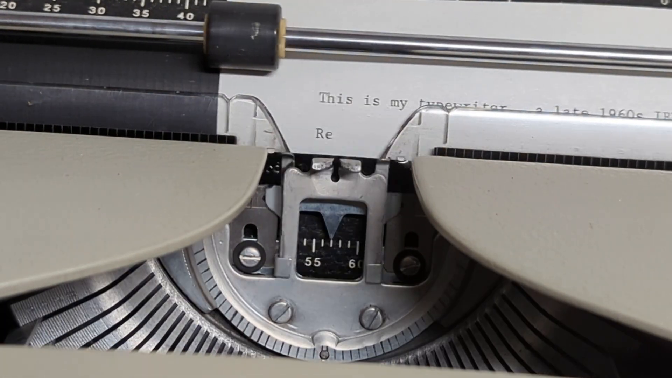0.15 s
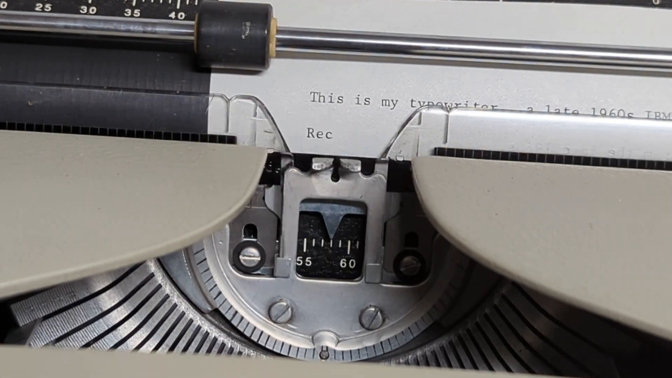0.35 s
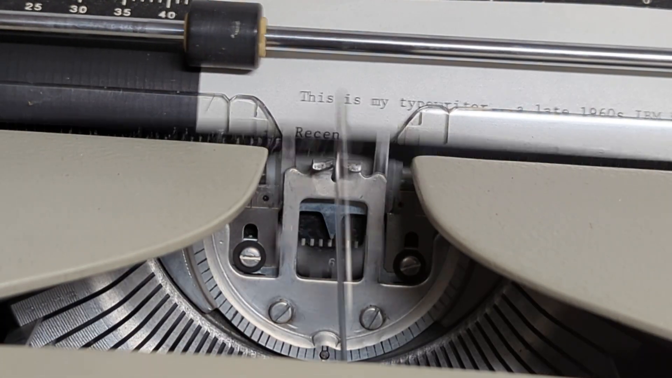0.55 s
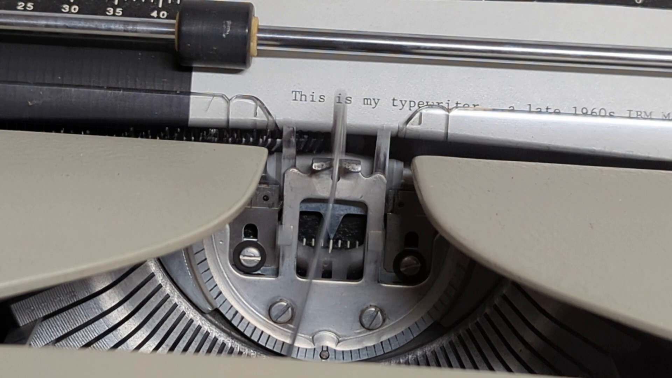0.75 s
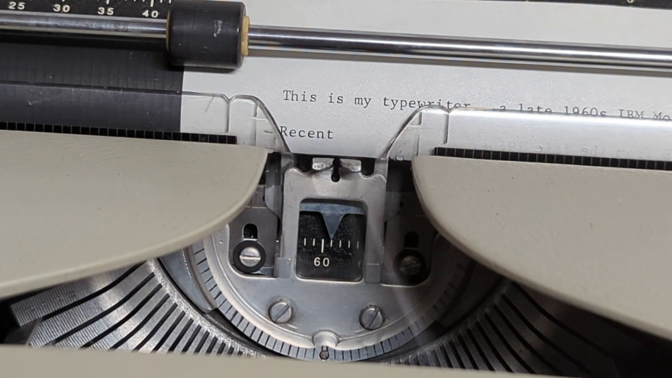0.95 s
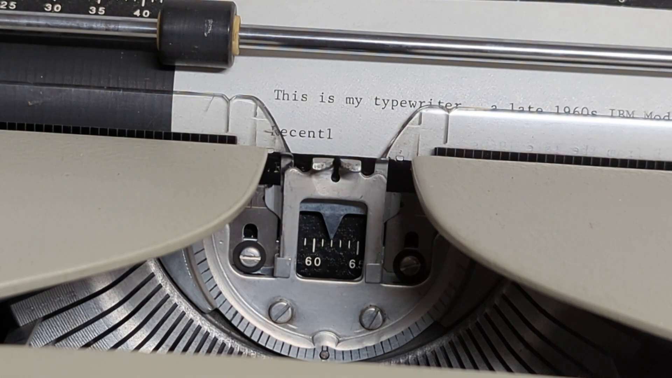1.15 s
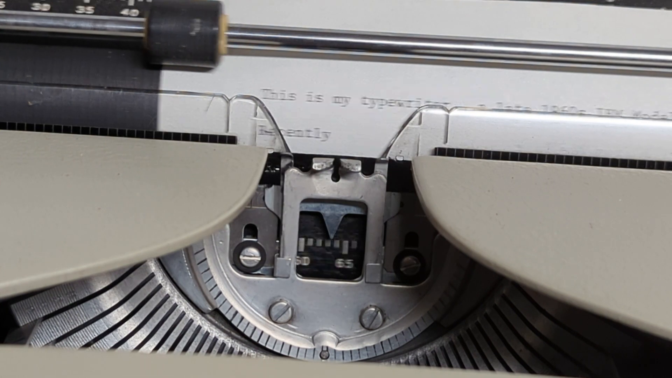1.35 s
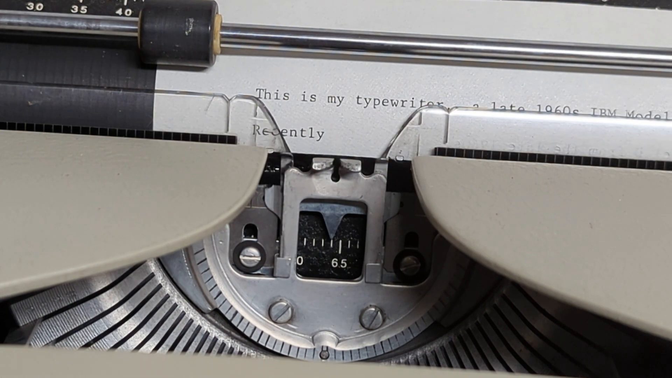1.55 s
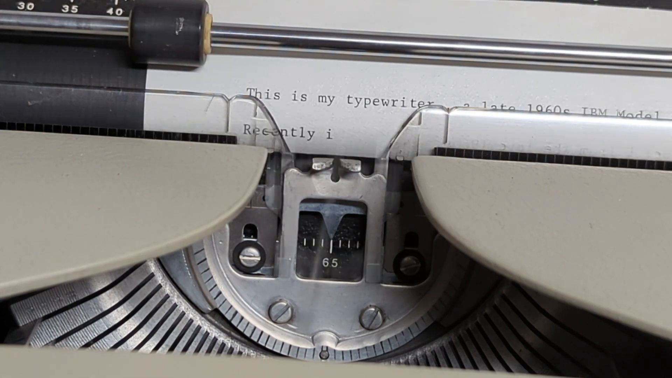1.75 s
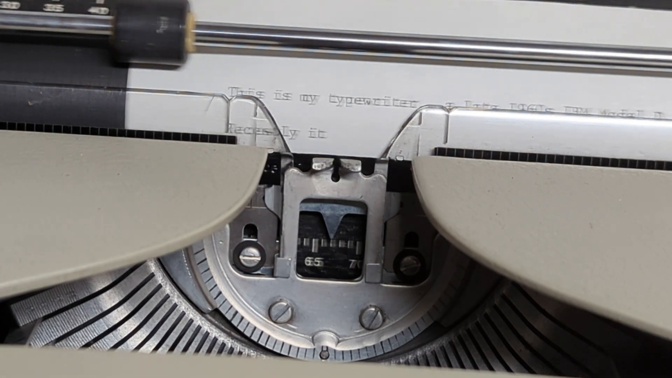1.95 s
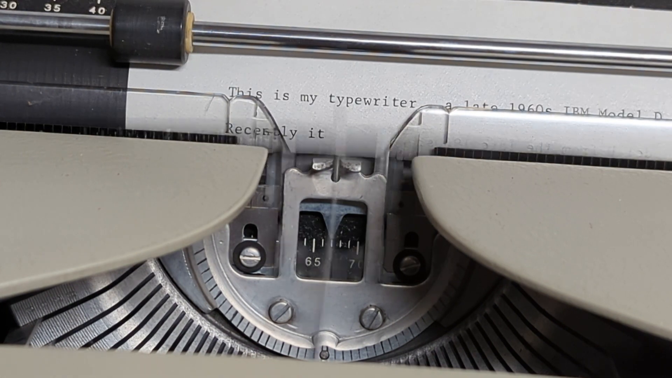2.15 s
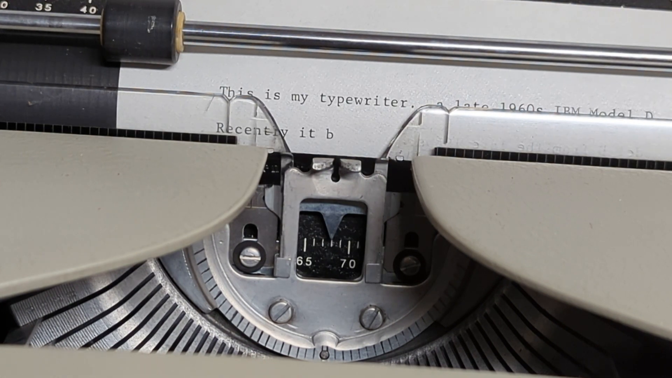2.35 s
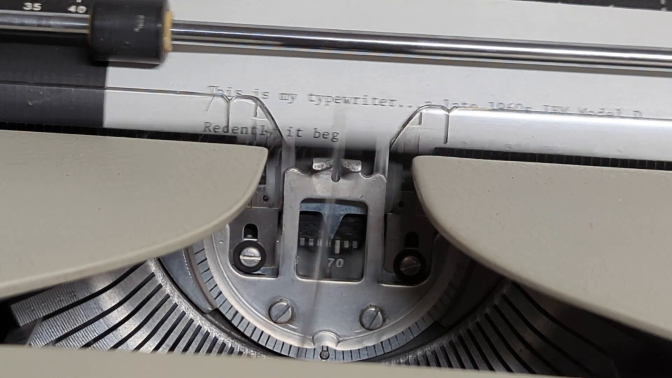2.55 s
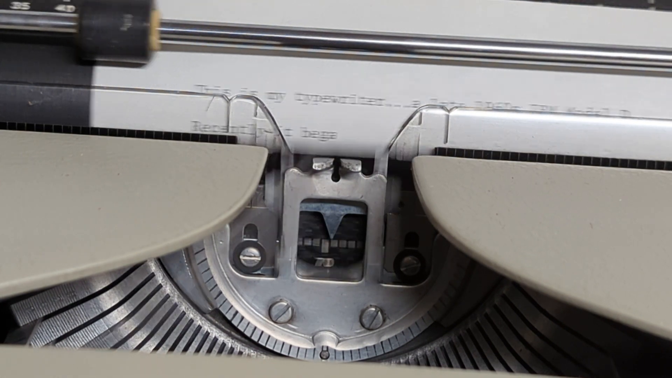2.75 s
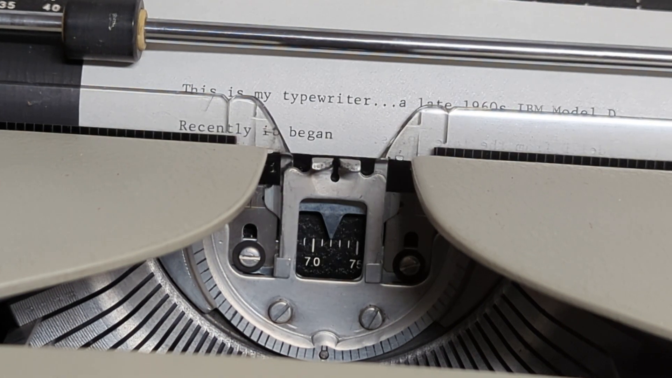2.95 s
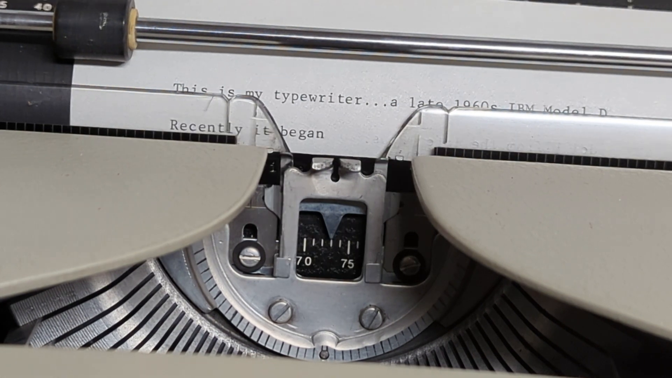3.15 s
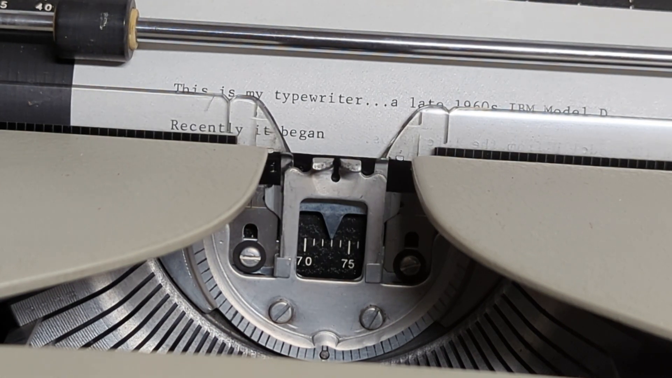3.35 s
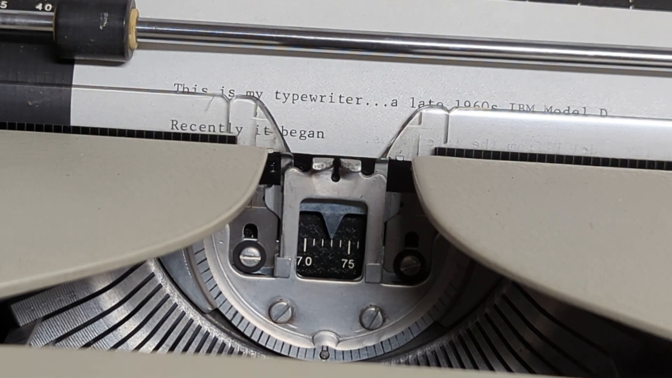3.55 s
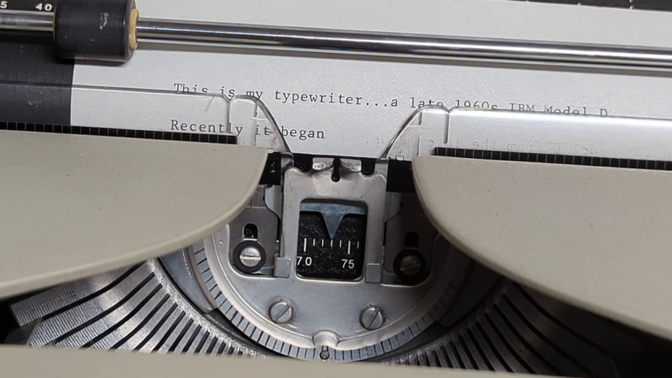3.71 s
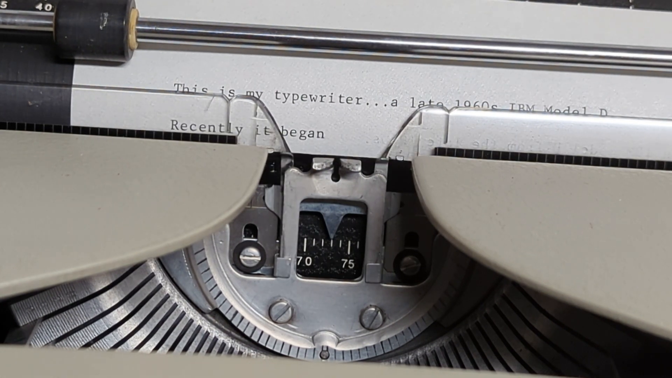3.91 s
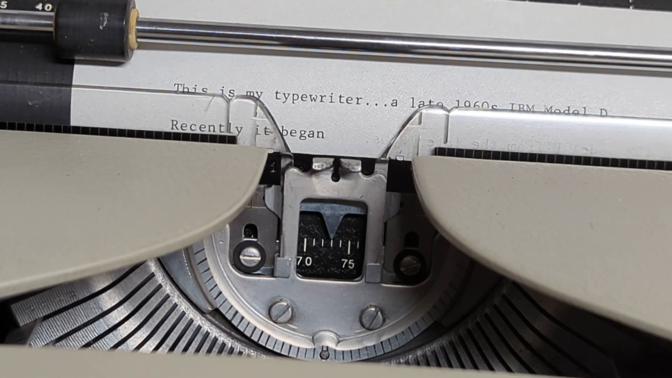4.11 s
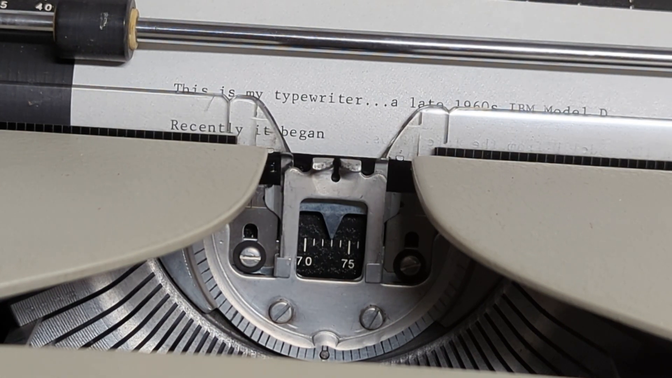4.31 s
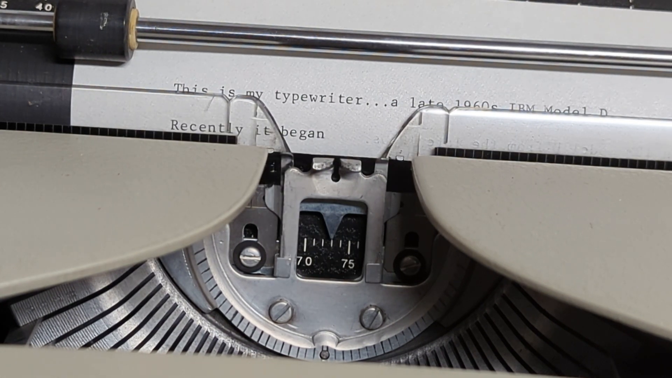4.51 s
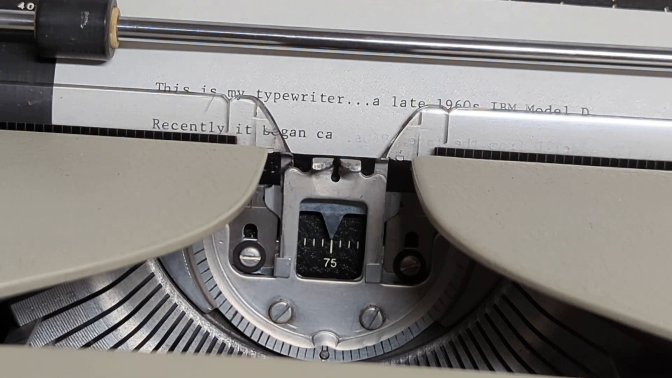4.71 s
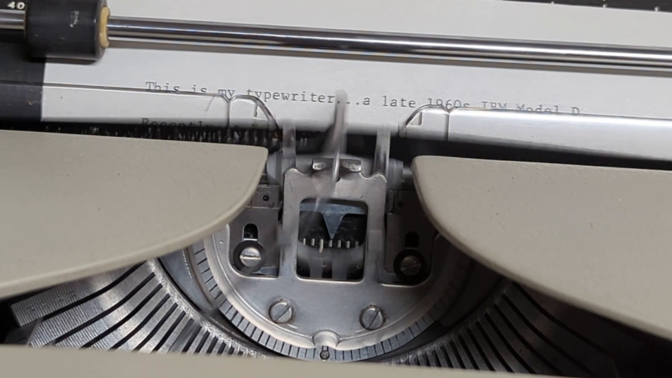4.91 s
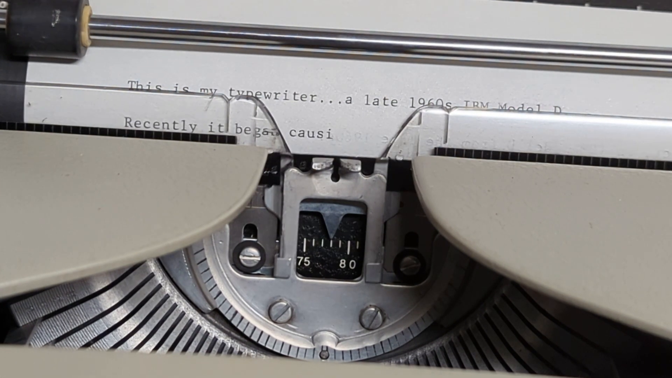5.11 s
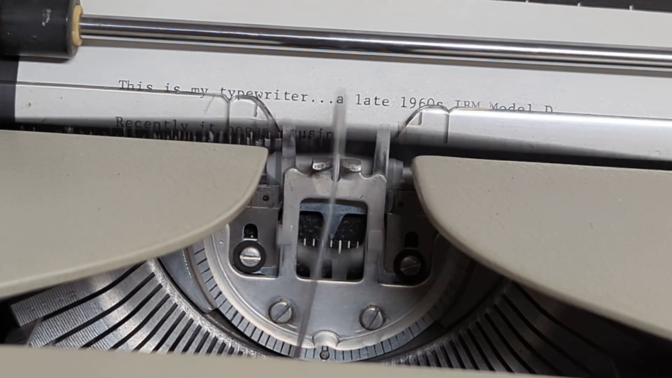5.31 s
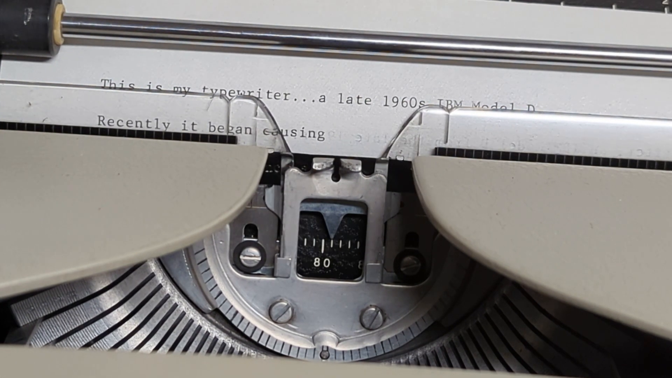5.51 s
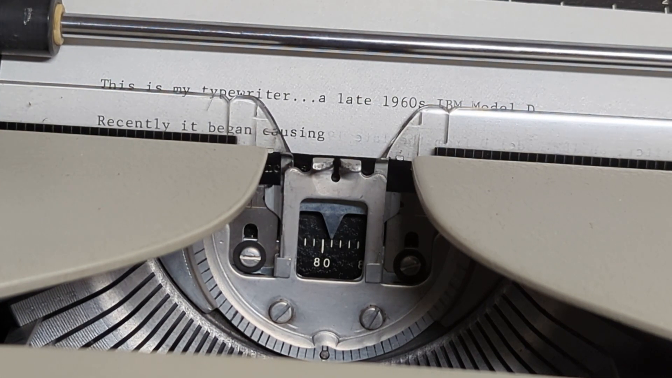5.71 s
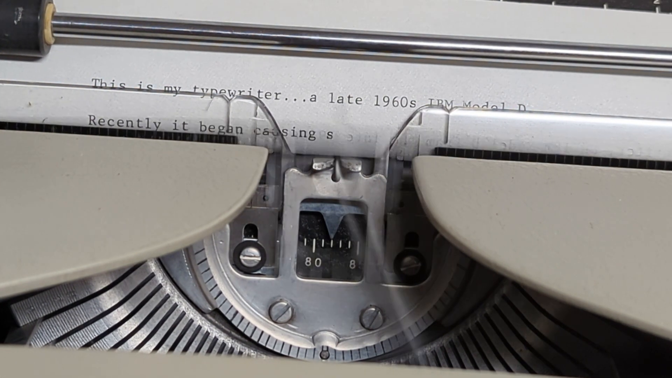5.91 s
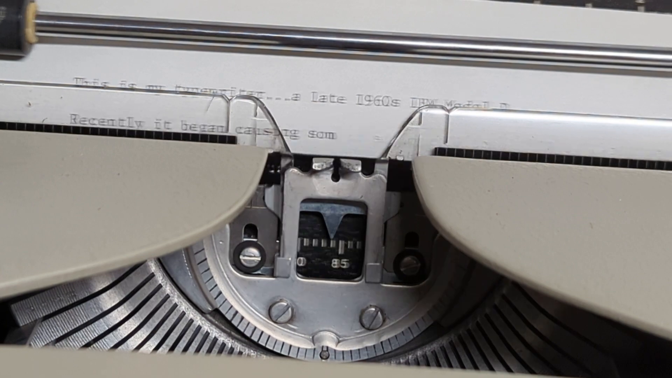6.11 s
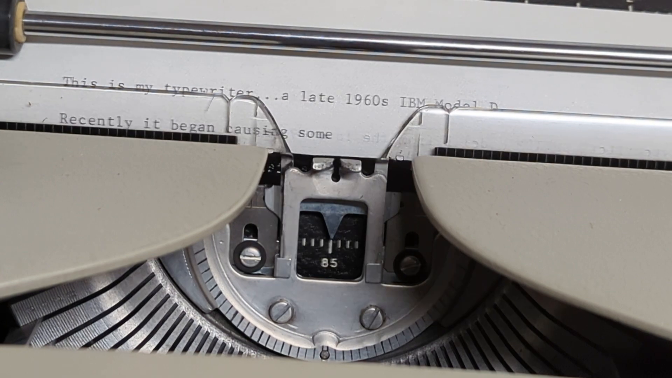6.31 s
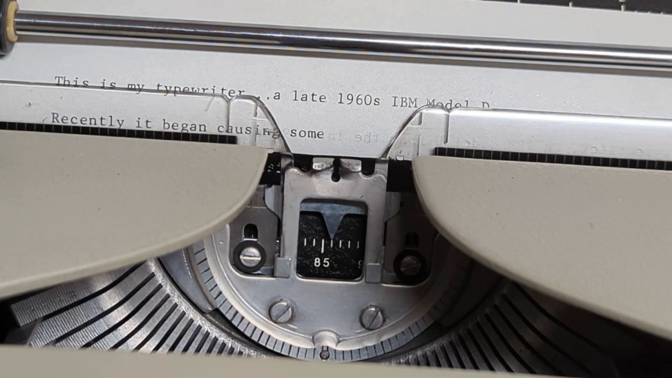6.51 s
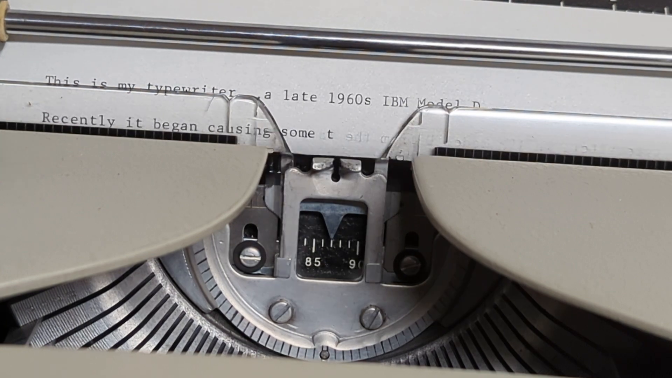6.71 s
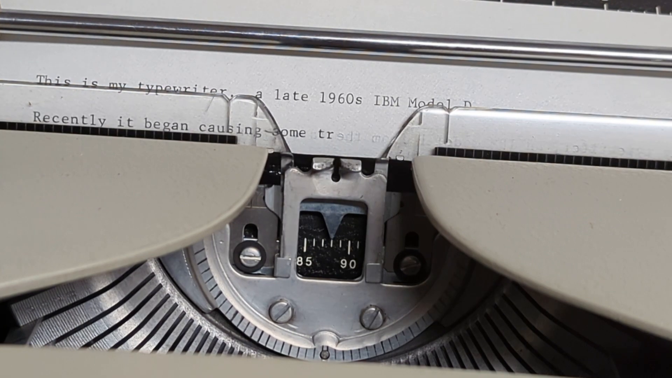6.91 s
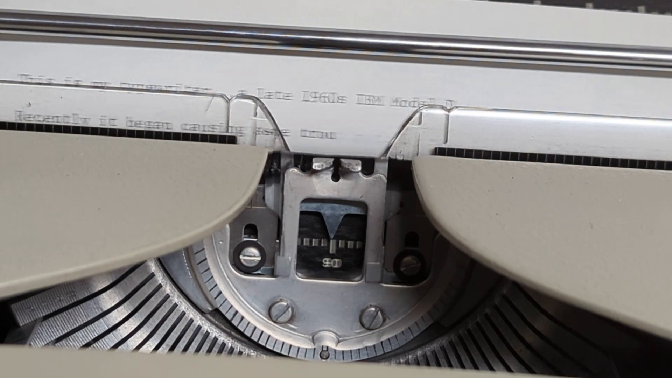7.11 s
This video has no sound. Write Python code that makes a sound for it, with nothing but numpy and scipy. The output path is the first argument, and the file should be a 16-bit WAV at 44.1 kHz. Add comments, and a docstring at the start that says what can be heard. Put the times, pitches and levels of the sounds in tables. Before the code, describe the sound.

An electric typewriter is heard up close in a small room, its motor humming low and its belt whirring steadily throughout. At the very start the basket of type bars drops with a thud and a brief metal clank. From about 0.2 to 3 seconds, type bars strike the paper in an uneven run of roughly five sharp clacks a second. Each has a short steel rattle and a low thump as the carriage jolts the desk, with light ticks and tiny pings in between. The space bar knocks more softly near 1.4, 2 and 3.2 seconds. Then the typing pauses, leaving little but the motor. At 4.6 seconds a faster run begins, broken by spaces near 5.5 and 6.4 seconds, with the last strike at about 7.2 seconds.

```python
"""First comes a thud and a clank as an electric typewriter's basket of type bars drops, over a humming
motor and a whirring belt. Then typing clacks along, with one pause. Each key trips a cam (a small rocking
lever) that swings a steel type bar up its guide. The bar slaps the paper on the roller, rings and falls
back, and the carriage steps on and jolts the desk. The case and a small room answer each clack."""
import sys
import numpy as np
from scipy import signal
from scipy.fft import rfft, irfft, next_fast_len
from scipy.io import wavfile
from scipy.ndimage import uniform_filter1d, map_coordinates

SR = 44100
rng = np.random.default_rng(int(sys.argv[2]) if len(sys.argv) > 2 else 0)


def bounce(signal):
    """Save signal as a 16-bit WAV file at the path given by the first command-line argument."""
    frames = np.transpose(np.atleast_2d(signal))
    limited = np.clip(frames, -1, 1)
    pcm = np.round(limited * 32767).astype(np.int16)
    wavfile.write(sys.argv[1], SR, pcm)


N = 320166

# The room's echo: (frequency [Hz], fade time [s]). A fade time is how long a sound takes to drop 60 dB.
ROOM_FADE = [(200, 0.57), (2000, 0.2), (12000, 0.11)]
# How alike the two ears' sounds are: (frequency [Hz], likeness [0 to 1])
EAR_LIKENESS = [(130, 1), (290, 0.98), (640, 0.8), (1400, 0.65), (3100, 0.2), (15000, 0.17)]
# The motor's tones: (pitch [Hz], level [dB], waver [dB])
MOTOR_TONES = [(120, -36, .4), (240, -66, 2), (914, -69, 3), (1951, -57.5, 2), (1967, -60.5, 2)]
# Motor and belt noise: (frequency [Hz], level [dB])
BELT_COLOUR = [(20, -17), (45, -14), (81, -0.5), (130, -3), (170, -21), (500, -21.5), (1100, -25),
               (1700, -32), (3200, -33), (5500, -37), (8800, -32), (11000, -39.5), (16000, -56)]
# The belt's whirr: (pitch [Hz], width [Hz], level [dB])
WHIRR_PEAKS = [(1965, 70, 9), (3950, 200, 7), (4870, 150, 7), (6300, 300, 3), (7260, 150, 7),
               (8750, 250, 5)]
# The carriage is let go, pulled and stopped: (time from the step [s], level [dB])
CARRIAGE_JOLTS = [(-.0404, -7.5), (-.0304, -3), (-.0035, -2.5)]
# The basket drops and bounces, and its steel plate clanks until it settles: (time [s], level [dB])
BASKET_BOUNCES = [(.007, -12), (0.0196, -13.5), (.039, -10.5)]
PLATE_CLANKS = [(0.024, -23), (.034, -17), (.057, -25), (.158, -20), (.319, -24), (0.466, -22)]
# Key levers tick as fingers land and lift: (time [s], level [dB])
KEY_TICKS = [(0.101, -24.5), (0.245, -30), (0.392, -22), (1.951, -33), (2.18, -34), (2.316, -25),
             (2.559, -25), (2.702, -27), (2.925, -27), (3.131, -35), (3.281, -34.5), (3.85, -47),
             (4.065, -47), (4.506, -43.5), (5.081, -21.5), (5.469, -24), (5.539, -30), (5.932, -23),
             (6.099, -26), (6.755, -33), (6.918, -28), (6.998, -31)]
# Tripped cams ping: (time [s], level [dB], pitch [Hz])
CAM_PINGS = [(0.1118, -10.5, 8920), (0.579, -9, 9760), (0.7816, -17, 6400), (1.2206, -14, 6480),
             (1.6756, -13, 7370), (2.4063, -23, 5420), (2.4174, -12.5, 9100), (4.8437, -12, 9080),
             (5.0786, -5, 9580), (5.247, -6, 9080), (5.8194, -10, 9700), (5.9698, -13, 8950),
             (6.1894, -9, 8800), (7.1197, -12, 7760)]
# The space bar: (time [s], wait until it springs back [s], clack [dB], hollow knock [dB])
SPACE_PRESSES = [(1.409, .049, -26, -31), (1.988, .066, -22, -27), (3.172, .058, -28, -33),
                 (5.514, .066, -25, -19.5), (6.396, .048, -22, -21)]
# Type bars hit the paper: (time [s], strength [dB], ribbon lifter [dB], swing rattle [dB],
# cam trips earlier by [s], cam [dB], bar falls back after [s], fall [dB], carriage steps after [s])
BAR_STRIKES = [(0.1587, -18.5, -41, -19.5, .046, -20.5, .055, -23, .095),
               (0.3176, -16.5, -39, -20, .047, -33, .058, -19, .091),
               (0.4692, -17.5, -45, -20.5, .040, -22, .055, -22, .089),
               (0.622, -16.5, -35, -20, .041, -15, .049, -20, .091),
               (0.8268, -17, -37, -20, .042, -14, .052, -20, .0935),
               (1.0532, -17, -41, -18.5, .040, -20, .059, -21, .094),
               (1.2685, -15.5, -35, -20.5, .044, -14.5, .050, -22, .096),
               (1.7237, -17, -44, -20.5, .044, -17, .053, -21, .0935),
               (1.8533, -15.5, -34, -18, .035, -26, .054, -21, .099),
               (2.2461, -16, -31, -21, .045, -24.5, .050, -22, .0936),
               (2.4625, -16, -39, -19.5, .043, -21, .056, -21, .097),
               (2.6152, -16, -30, -19.5, .040, -26, .047, -22, .090),
               (2.7955, -16, -39, -21.5, .044, -34, .059, -20, .094),
               (2.9722, -17.5, -35.5, -19, .036, -17, .047, -20, .096),
               (4.6323, -16.5, -46, -18.5, .047, -34, .052, -24, .098),
               (4.6935, -17.5, -37, -17, .043, -28, .058, -22, .088),
               (4.8856, -16.5, -39, -18.5, .042, -21, .055, -23, .092),
               (4.994, -18.5, -46, -22, .045, -20, .055, -18, .094),
               (5.1445, -16.5, -37, -21, .044, -18, .054, -20.5, .093),
               (5.2915, -17, -34, -20, .043, -9, .047, -21, .094),
               (5.4019, -15.5, -30, -21.5, .036, -32, .050, -22, .094),
               (5.8625, -17.5, -40, -19.5, .043, -18.5, .054, -19, .095),
               (6.0164, -16.5, -36, -17, .044, -20, .056, -21.5, .095),
               (6.1611, -18, -40, -16, .041, -34, .040, -20, .089),
               (6.2382, -15.5, -41, -21, .043, -20, .060, -23, .097),
               (6.647, -16.5, -38, -18, .050, -31, .053, -18, .096),
               (6.8302, -16, -41, -19.5, .052, -34, .051, -20.5, .092),
               (7.0648, -17.5, -41, -17, .050, -33, .055, -19, .090),
               (7.1661, -15.5, -42, -20, .044, -17, .042, -22, .088)]
# The tones of each part when it is hit: (pitch [Hz], level [dB], fade time [s])
DESK_TONES = [(70.1, 0.5, 0.088), (54, -17.5, 1), (93.5, -24, 0.067)]
BASKET_TONES = [(84, -3.5, 0.41), (60, -10.5, 0.3), (149, -10, 0.095), (234, -12, 0.11)]
PLATE_TONES = [(2250, -1, 0.035), (2640, 3.5, 0.045), (3930, -1.5, 0.044)]
SPACE_BAR_TONES = [(520, -2, .035), (610, -1, .032)]
LIFTER_TONES = [(912, 0, .07), (1075, -9, .05)]
SLAP_TONES = [(2790, -12, 0.0075), (5960, -6, 0.0027), (7360, -2.5, 0.0039), (10050, -2.5, 0.0027)]  # the steel letter on the paper
# Where each part rings when it is shaken: (pitch [Hz], width [Hz], level [dB])
LINK_PEAKS = [(5700, 110, -14.5), (6385, 230, 8), (8900, 300, -25), (8900, 110, -26), (11700, 440, -10),
              (12100, 290, -15)]
FRAME_PEAKS = [(2015, 90, 1), (2640, 110, 3), (3940, 100, -4), (4340, 200, -2)]
CASE_PEAKS = [(292, 80, -11), (324, 56, -31), (504, 157, 5), (655, 220, -16.5), (878, 17, -9.5),
              (1040, 27, 7.5)]
TYPE_BAR_PEAKS = [(6640, 100, -8), (6935, 71, -4), (7222, 71, 0), (7370, 76, -4), (7700, 82, -10),
                  (8100, 55, -6), (8500, 110, -11.5), (8910, 41, -4.5), (9420, 110, -16), (10140, 140, -14)]
# The overall tone of the rattling metal: (frequency [Hz], level [dB])
METAL_COLOUR = [(88, -35), (150, -4), (494, -16.5), (905, -11), (1210, -13), (2020, -12.5), (3700, -14),
                (7180, -14), (9800, -11.5), (16000, -21.5)]

# How each kind of contact rattles: (treble [dB], middle [dB], knock [dB], rise time [s], fade time [s])
TICK, BASKET_DROP = (0, -9, -11, .007, .05), (-9, -7, -11, .01, .045)
CAM, CAM_SNAP = (-1, -10, -12, .007, .06), (-1, -11, -12, .004, .04)
BAR_FALL, BAR_SETTLE = (-1, -4, -6.5, .024, .07), (-16, -18, -11, .012, .06)
SPACE_CAM, SPACE_LINK = (-19.5, -24.5, -48, .011, .045), (-34, -33, -40, .006, .04)
SPACE_RETURN = (-1.5, -.5, -2.5, .024, .07)
# The rattle before and after a strike: (treble [dB], middle [dB], knock [dB])
SWING_DB, AFTER_DB = [-1, -6.5, -9.5], [-4.5, -4, -8.5]


def amp(db):
    """Turns decibels into a number to multiply by."""
    return 10 ** (np.asarray(db) / 20)


def unit(x):
    """Scales a sound to an average power of one."""
    return x / np.sqrt(np.mean(x ** 2) + 1e-20)


def along(points, hz):
    """Reads between (frequency, value) points, spaced by octaves."""
    f, values = np.transpose(points)
    return np.interp(np.log(hz + 1), np.log(f + 1), values)


def wobble(rate):
    """A smooth curve through `rate` random values a second."""
    return map_coordinates(rng.standard_normal(int(N * rate / SR) + 4), [np.arange(N) * rate / SR])


def filtered(x, response):
    """Multiplies each frequency of a sound by response(frequency)."""
    size = next_fast_len(N + SR // 2)
    return irfft(rfft(x, size) * response(np.fft.rfftfreq(size, 1 / SR)), size)[..., :N]


def resonant(peaks, f):
    """How a part with these ringing peaks answers each frequency."""
    return sum((-1) ** k * amp(db) * 1j * f * width / (hz * hz - f * f + 1j * f * width)
               for k, (hz, width, db) in enumerate(peaks))


def band(f, lo_hz, hi_hz):
    """Softly shuts out frequencies beyond two limits."""
    return 1 / np.sqrt((1 + (lo_hz / (f + 1)) ** 6) * (1 + (f / hi_hz) ** 6))


def ringing(tones, t, rise_s=None):
    """One fading sine wave per tone; rise_s softens the start."""
    hz, db, fade_s = np.transpose(tones)[:, :, None]
    onset = 1 - np.exp(-t / rise_s) if rise_s else 1
    return onset * amp(db - 60 * t / fade_s) * np.sin(2 * np.pi * hz * t)


def add(track, s, sound):
    """Mixes a sound in, starting at s seconds."""
    i = round(s * SR)
    track[..., i:i + sound.shape[-1]] += sound[..., :max(N - i, 0)]


def rattle(patchy_db, grain_db):
    """Two noises whose tone and loudness flicker together."""
    spectra = signal.stft(rng.standard_normal((2, N)), nperseg=256)[2]
    patches = uniform_filter1d(rng.standard_normal(spectra.shape[1:]), 3, axis=0)
    patches = unit(uniform_filter1d(patches, 4, axis=1))
    pair = signal.istft(spectra * amp(patchy_db * patches), nperseg=256)[1][:, :N]
    return unit(pair * amp(grain_db * wobble(700)))


def stereo(pair, lag_s):
    """Turns a (centre, side) pair into left and right; the right arrives a little later."""
    angle = lambda hz: np.arccos(np.clip(along(EAR_LIKENESS, hz), -1, 1)) / 2
    centre, side = filtered(pair, lambda hz: [np.cos(angle(hz)), np.sin(angle(hz))])
    delay = lambda hz: np.exp(1j * np.pi * hz * lag_s * np.array([[1], [-1]]))
    return filtered(np.array([centre + side, centre - side]), delay)


def room_echo(x):
    """The small room answers a sound; low notes linger longest."""
    hz, t, spectra = signal.stft(rng.standard_normal((2, SR // 2)), SR, nperseg=256)
    fade = amp(-60 * t / along(ROOM_FADE, hz)[:, None])
    tail = signal.istft(spectra * fade, SR, nperseg=256)[1]
    delayed = np.pad(x, ((0, 0), (300, 0)))
    return signal.fftconvolve(delayed, tail / np.linalg.norm(tail[0]), axes=1)[:, :N]


def motor():
    """The motor hums and whines over belt noise, whose treble rustles as the drive roller turns."""
    hum, t = np.zeros(N), np.arange(N) / SR
    for hz, db, waver_db in MOTOR_TONES:
        level = np.sqrt(2) * amp(db + waver_db * wobble(8.4))
        hum += level * np.sin(2 * np.pi * (hz * t + rng.random()) + .13 * waver_db * wobble(30))
    colour = lambda f: amp(along(BELT_COLOUR, f)) * np.sqrt(1 + np.abs(resonant(WHIRR_PEAKS, f)) ** 2)
    belt = unit(filtered(rng.standard_normal((2, N)), colour))
    treble = filtered(belt, lambda f: band(f, 2500, 20000))
    rustle = treble * (amp(2 * wobble(7) + 2.4 * wobble(30)) - 1)
    return amp(-41.5) * (belt + rustle) + hum * [[1], [.3]]


def desk_thuds():
    """Each carriage step shoves the desk one way, then the other; the dropping basket thuds too."""
    out, t = np.zeros(N), np.arange(SR // 2) / SR
    steps = [s + wait for s, *_, wait in BAR_STRIKES] + [s + .09 for s, *_ in SPACE_PRESSES]
    thud = amp(-15) * ringing(DESK_TONES, t).sum(0)
    for s in steps:
        for (offset, db), direction in zip(CARRIAGE_JOLTS, (1, 1, -1)):
            add(out, s + offset, direction * amp(db + rng.normal(0, 1)) * thud)
    out = filtered(out, lambda f: band(f, 45, 146))  # rubber feet pass only the slow shaking
    for s, db in BASKET_BOUNCES:
        add(out, s, amp(db) * ringing(BASKET_TONES, t, rise_s=.00073).sum(0))
    return out


def small_parts():
    """Cams ping, the basket's plate clanks, the space bar knocks and the ribbon lifter twangs."""
    out, t = np.zeros((2, N)), np.arange(SR // 10) / SR
    for s, db, hz in CAM_PINGS:
        tones = [(hz, 0, .035), (hz * rng.uniform(.55, .61), -8, .03),
                 (hz * rng.uniform(.92, 1.5), -8, .02)]
        add(out, s, amp(db - 3.5) * rng.choice([-.7, .7], (2, 3)) @ ringing(tones, t, rise_s=.00027))
    for s, db in PLATE_CLANKS:
        add(out, s, amp(db) * rng.choice([-1, 1], (2, 3)) @ ringing(PLATE_TONES, t, rise_s=.00044))
    knock = ringing(SPACE_BAR_TONES, t, rise_s=.0025).sum(0) * [[1], [.4]]
    for s, back_s, _, db in SPACE_PRESSES:
        add(out, s + back_s - .007, amp(db) * knock)
    twang = ringing(LIFTER_TONES, t, rise_s=.0028).sum(0) * [[1], [.4]]
    for s, _, lifter_db, *_ in BAR_STRIKES:
        add(out, s - .02, amp(lifter_db + 10) * twang)  # while the bar is still on its way
    return out


def chinks(loudness, count):
    """Small steel parts touch at random while the works move; each rings at its own pitch."""
    out, t = np.zeros((2, N)), np.arange(SR // 30) / SR
    for when, pitch, size, turn in rng.random((count, 4)):
        hz = 1800 * 6.5 ** pitch
        body = int(hz < 5000)  # high chinks follow the links, lower ones the frame
        level = loudness[body, int(when * N)] * amp(-8 + 16 * size)
        direction = [[np.cos(2 * np.pi * turn)], [np.sin(2 * np.pi * turn)]]
        add(out, when * N / SR, level * ringing([(hz, 0, .045)], t, rise_s=.0008) * direction)
    return out


def contacts():
    """Lists the moments when moving parts meet: (time [s], level [dB], kind of contact)."""
    rows = [(s, db, TICK) for s, db in KEY_TICKS]
    rows += [(s - .008, db, BASKET_DROP) for s, db in BASKET_BOUNCES]
    for s, *_, lead_s, cam_db, back_s, fall_db, _ in BAR_STRIKES:
        treble, middle, knock, *times = CAM_SNAP if cam_db > -17.5 else CAM
        lost_db = .3 * (cam_db + 20)  # a louder cam sounds brighter
        rows += [(s - lead_s, cam_db, (treble, middle - lost_db, knock - lost_db, *times))]
        rows += [(s + back_s, fall_db, BAR_FALL), (s + back_s + .018, fall_db, BAR_SETTLE)]
    for s, back_s, db, _ in SPACE_PRESSES:
        rows += [(s, 0, SPACE_CAM), (s + .026, 0, SPACE_LINK), (s + back_s, db, SPACE_RETURN)]
    return rows


def clatter():
    """Every contact rattles loose metal in the links (treble), frame (middle) and case (knock)."""
    power, t = np.zeros((3, N)), np.arange(SR // 4) / SR
    slide_s, swing_s = .014, .025
    slide = np.hanning(2 * round(slide_s * SR))  # a lever slides before it lands
    for s, level_db, (*share_db, rise_s, fade_s) in contacts():
        s, db = max(s, .001), level_db + np.c_[share_db]
        rise_s = min(rise_s, s)
        shape = np.minimum(t / rise_s, 1) ** 3 * amp(-120 * np.maximum(t - rise_s, 0) / fade_s)
        add(power, s - rise_s, amp(db) ** 2 * shape)
        add(power, max(s - rise_s - slide_s, 0), amp(db - 19.5) ** 2 * slide)
    swell = np.sin(np.pi / 2 * np.minimum(t / swing_s, 1)) ** 4  # a bar scrapes ever faster up its guide
    scrape = swell * amp(-120 * np.maximum(t - swing_s, 0) / np.c_[[.045, .055, .022]])
    for s, db, _, swing_db, *_ in BAR_STRIKES:
        add(power, s - swing_s - .006, amp(swing_db + np.c_[SWING_DB]) ** 2 * scrape)
        add(power, s, amp(db + np.c_[AFTER_DB] - 60 * t / np.c_[[.17, .13, .12]]) ** 2)
    loudness = np.sqrt(power / 2)
    out = chinks(loudness, count=1600)
    bodies = [(LINK_PEAKS, 5000, 16000), (FRAME_PEAKS, 1400, 5000), (CASE_PEAKS, 170, 1400)]
    for level, (peaks, *limits_hz) in zip(loudness, bodies):
        colour = lambda f: (amp(along(METAL_COLOUR, f)) * band(f, *limits_hz)
                            * (1 + 1.3 * resonant(peaks, f)))
        out += level * unit(filtered(rattle(patchy_db=1.8, grain_db=2.8), colour))
    return out


def type_bars():
    """A bar cracks on the paper and bounces twice; the bars chatter together, so their ring is rough."""
    cracks, chatter, t = np.zeros((2, N)), np.zeros(N), np.arange(SR // 8) / SR
    size = (2, len(SLAP_TONES))
    for s, strike_db, *_ in BAR_STRIKES:
        for delay_s, crack_db, chatter_db in [(0, 9, 20), (.004, 0, 12), (.011, -1, 13.5)]:
            at = s - .0005 + delay_s * rng.uniform(.91, 1.3)
            strengths = amp(rng.normal(0, 1.57, size)) * rng.choice([-1, 1], size)
            add(cracks, at, amp(strike_db + crack_db + 6) * strengths @ ringing(SLAP_TONES, t))
            add(chatter, at, amp(strike_db + chatter_db - 60 * t / .056))
        add(chatter, s - .016, amp(strike_db + 5) * np.hanning(round(.02 * SR)))  # a brush on the way up
    shake = chatter * rattle(patchy_db=6, grain_db=1.5) + amp(8.5) * cracks
    return cracks + filtered(shake, lambda f: resonant(TYPE_BAR_PEAKS, f))


def scene():
    """Mixes the typing, its echo and the motor, with the desk's thuds in the centre."""
    typing = clatter() + type_bars() + small_parts()
    mix = typing + amp(-9.5) * room_echo(typing) + motor() + desk_thuds() * [[1], [0]]
    return stereo(mix, lag_s=.0001414)


def record(dry):
    """The microphone weakens the deep bass; its input rounds off peaks and cuts the highest treble."""
    x = filtered(dry, lambda hz: band(hz, 32, 30000))
    rounded = x / (1 + np.abs(x / .8) ** 4) ** .25
    return filtered(rounded, lambda hz: hz < 16100)


dry = scene()
out = record(dry)
bounce(out)
```